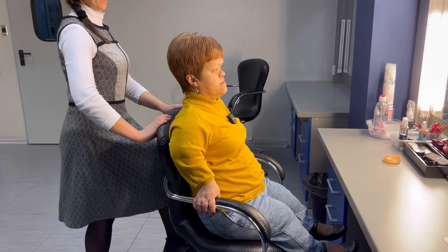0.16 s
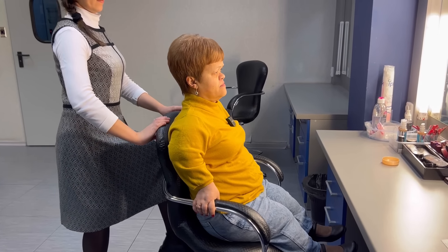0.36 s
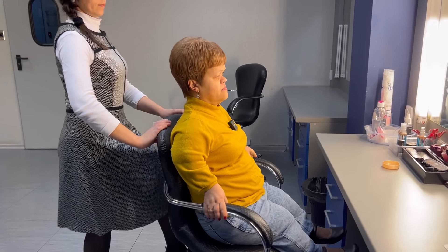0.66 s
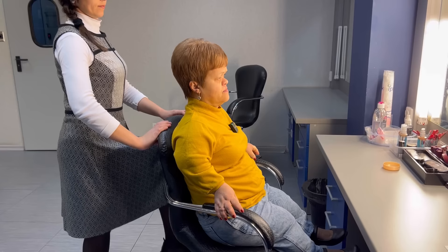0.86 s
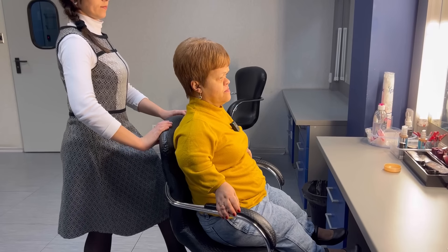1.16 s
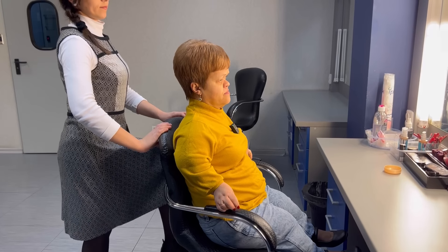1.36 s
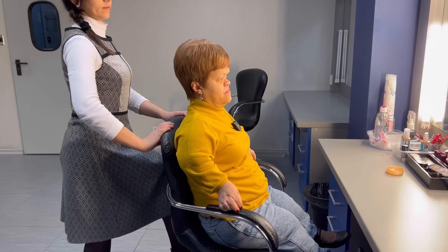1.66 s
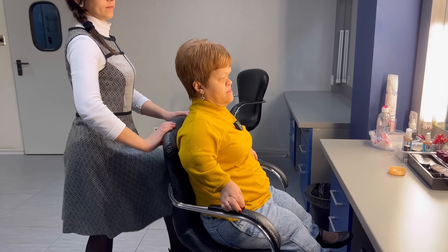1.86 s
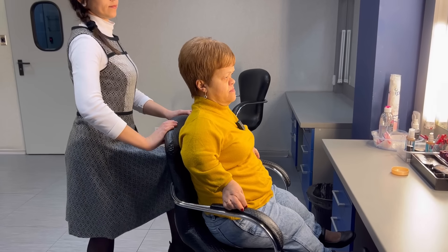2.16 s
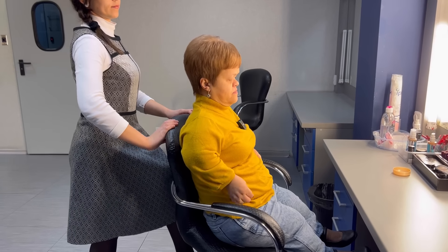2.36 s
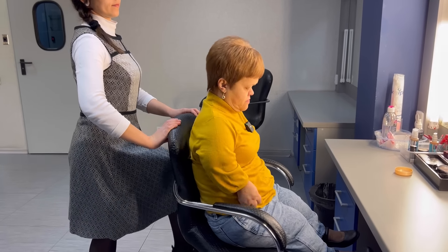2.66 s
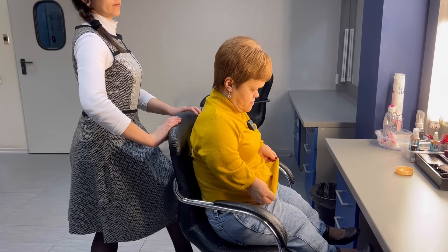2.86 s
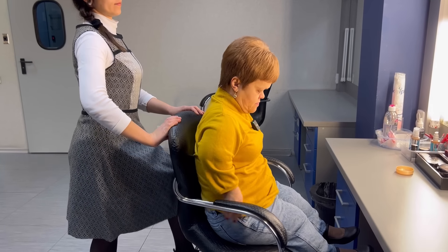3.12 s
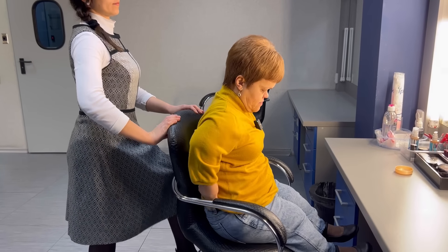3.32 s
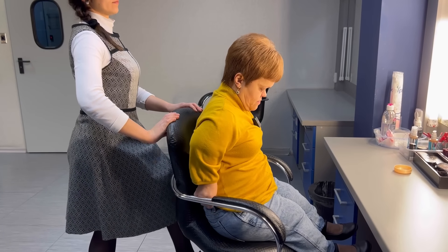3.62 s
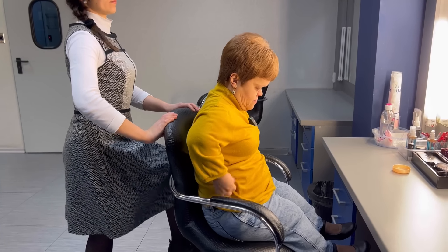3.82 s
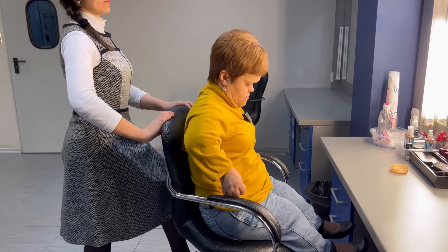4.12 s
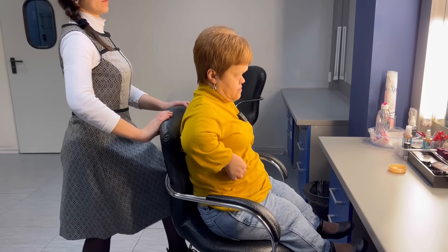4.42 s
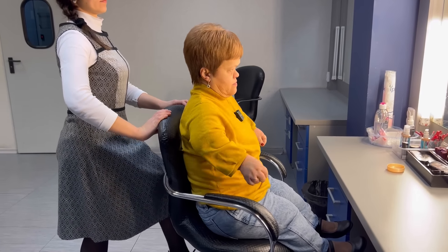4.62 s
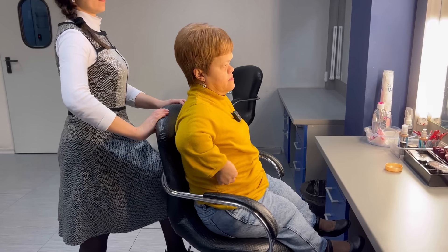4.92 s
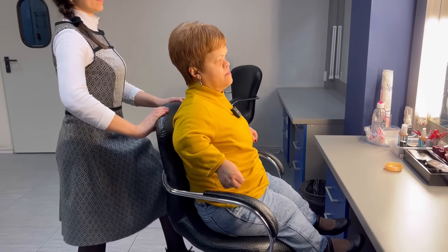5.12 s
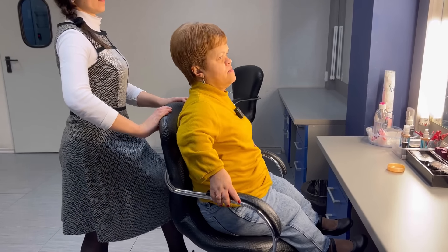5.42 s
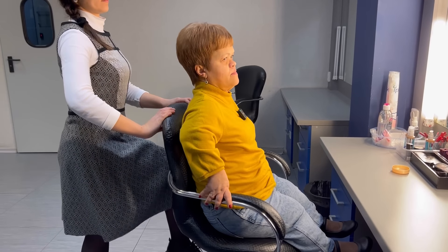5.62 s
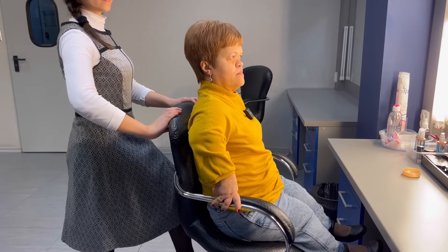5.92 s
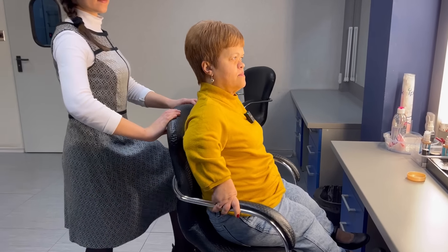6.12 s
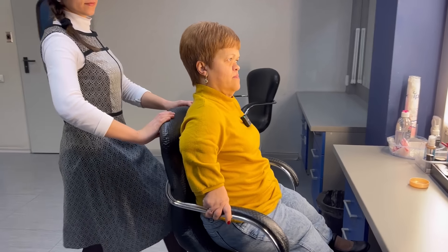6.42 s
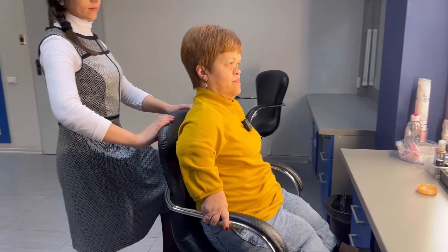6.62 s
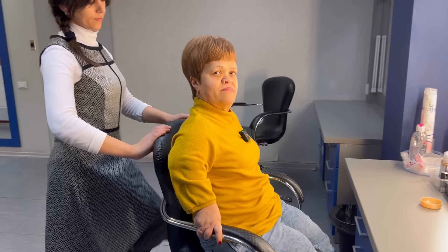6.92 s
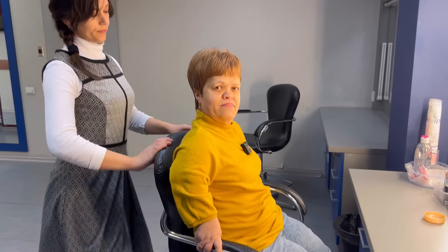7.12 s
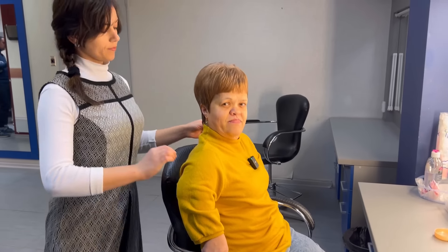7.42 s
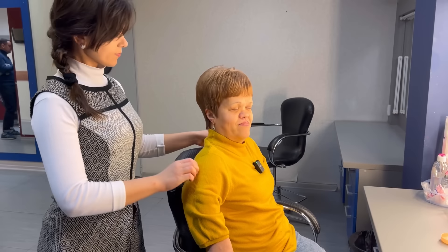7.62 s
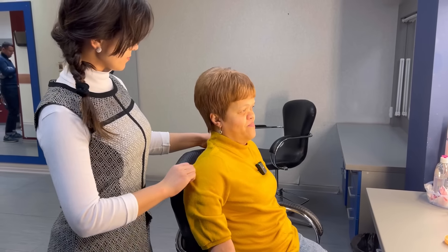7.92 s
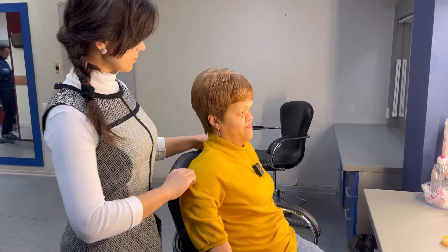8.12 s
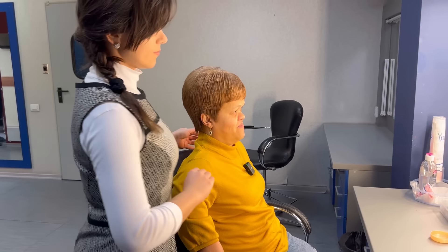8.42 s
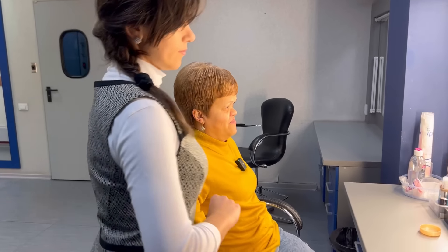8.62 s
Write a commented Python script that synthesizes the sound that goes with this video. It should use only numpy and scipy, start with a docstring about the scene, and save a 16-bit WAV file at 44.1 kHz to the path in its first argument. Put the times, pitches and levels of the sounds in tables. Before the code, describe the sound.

From the very start, a foot pumps the pedal of a hydraulic salon chair, fifteen strokes at a little over two a second. Each push is a dull clunk with a steel clank and a low boom from the chair base, and the pedal knocks softly as it springs back. The strokes are slightly brighter from about 2.7 to 4 seconds, and the last lands at about 6.3 seconds. Faint upholstery ticks and clothing rustles come in between. From about 6.6 to 6.9 seconds the pedal is kicked and rattles briefly. Three soft-soled footsteps follow at roughly 7.3, 7.9 and 8.5 seconds, the last one heaviest, with a light rustle of cloth. The chair is a couple of metres from the microphone in a bare, hard-floored room with a short echo. A quiet, low room tone and faint hiss run underneath.

```python
"""A pedal clanks down and knocks softly back, fifteen strokes in all; then it is kicked and rattles.
A foot is pumping up a hydraulic salon chair a couple of metres away, in a bare, hard-floored room.
Each push lands steel on steel and makes the base boom; a spring lifts the pedal again.
Upholstery ticks, clothes rustle and three steps follow, over a quiet room tone and faint hiss."""
import sys
import numpy as np
from scipy import signal
from scipy.fft import rfft, irfft, next_fast_len
from scipy.io import wavfile
from scipy.ndimage import uniform_filter1d

SR = 44100
rng = np.random.default_rng(int(sys.argv[2]) if len(sys.argv) > 2 else 0)


def dump(signal):
    """Clip the signal to [-1, 1] and save it as 16-bit WAV at the path in sys.argv[1]."""
    limited = np.clip(np.atleast_2d(signal).T, -1, 1)
    pcm = np.round(limited * 32767).astype(np.int16)
    wavfile.write(sys.argv[1], SR, pcm)


N = 386757
SIZE = 32768  # samples in one short sound
T = np.arange(SIZE) / SR
HZ = np.fft.rfftfreq(SIZE, 1 / SR)
TOP_HZ = 15830
PUMP_START_S, PUMP_END_S = 0.2, 6.5
# deep notes of the chair base and floor: f/Hz, level/dB, time to fade by 60 dB/s
BASE_NOTES = [(50.2, -12.5, 0.39), (71.5, -8, 0.34), (101.4, -8, 0.24), (115.6, 0, 0.3), (178.4, -4, 0.29),
              (234.4, -6.5, 0.44), (271.2, -9.5, 0.33)]


def pedal_pushes(walls):
    """The pedal lands with a dull clunk; then steel seats on steel, ringing higher on hard strokes."""
    # strokes: t/s, weight of the foot/dB, clank of the steel/dB, brightness/dB
    strokes = [(0.101, -31, -26.5, -1.5), (0.556, -35.5, -29.5, -1), (1.019, -35, -30.5, -1),
               (1.461, -27.5, -29.5, -1), (1.880, -27.5, -28, 0), (2.288, -29.5, -29.5, -1),
               (2.713, -28, -29, 2), (3.127, -28.5, -28.5, 2.5), (3.547, -29.5, -29, 3),
               (3.964, -29.5, -29.5, 4), (4.419, -30.5, -33.5, 0), (4.885, -35, -36.5, -1),
               (5.360, -28.5, -32.5, 0), (5.783, -29, -35, 2), (6.259, -26.5, -32.5, 0)]
    # tone of the lower stop: f/Hz, level/dB
    stop_tone = [(120, -44), (230, -4.5), (320, 2), (480, -1), (600, -5), (860, -6.5), (1250, -2),
                 (1500, -9.5), (1900, -14), (2250, -26.5), (3400, -34.5), (8000, -44), (15000, -36.5)]
    # where the pump and pedal ring: f/Hz, width/Hz, boost/dB
    pump_rings = [(414, 84, 8), (487, 10, 1), (776, 21, 6.5), (970, 35, 5.5), (1063, 37, 2.5),
                  (1187, 17, 1), (1275.7, 15.6, -2), (1416, 18, -4), (2634, 550, 10), (4300, 460, 8.5),
                  (4930, 370, 7.5), (5700, 210, 6), (6370, 120, 7), (6820, 540, 7.5), (7800, 110, 5),
                  (8470, 120, 6), (9820, 140, 8.5), (13400, 160, 5), (14950, 250, 1)]
    # what one dB of brightness adds: f/Hz, boost/dB
    brighter = [(1900, 0), (2650, -.7), (5000, 0), (10000, .5), (15000, 0)]
    usual_db = -30  # an ordinary stroke
    out = np.zeros(N)
    for start, weight_db, clank_db, bright_db in strokes:
        weight, clank = weight_db - usual_db, clank_db - usual_db
        hardness = 0.49 * weight + 0.89 * clank
        landing = shape(contact(0.0066, chatter_db=-13), curve([(500, -5.5), (1300, -5), (3000, -16)]))
        seating = shape(contact(0.0088, chatter_db=-2), curve([(400, -21), (1000, 3)]))
        add(landing, 0.0035 * rng.uniform(0.756, 1.2), seating)
        edge_hz = 1773 + 29 * hardness
        body = colour(stop_tone, vary(pump_rings, scatter_db=0.5) + [(edge_hz, 220, 8)])
        body += bright_db * curve(brighter)
        bands = [(300, 710, weight_db - 8),  # clunk
                 (730, 1230, clank_db - 8.5),  # clank
                 (1510, 1766, -52 + hardness),  # hard edge of the steel
                 (2830, 5050, -57.7 + 0.51 * clank)]  # bright tick
        add(out, start, ring(in_room(landing, walls, echo_db=6), body, bands))
        add(out, start, boom(BASE_NOTES, -41.5 + 1.55 * weight, swell_cycles=1.36))
    return out


def pedal_returns(walls):
    """The spring lifts the pedal against a padded stop; the loose linkage knocks faintly."""
    # the pedal springs back: t/s, level/dB
    returns = [(0.316, -47), (0.789, -42), (1.233, -38.5), (2.055, -39), (2.476, -36.5), (2.908, -37),
               (3.318, -41), (3.734, -38), (4.168, -44.5), (4.645, -38.5), (5.109, -36), (5.541, -38),
               (6.005, -42), (6.465, -45)]
    # the linkage takes up its slack: t/s, level/dB
    slack_knocks = [(0.923, -41), (1.671, -39), (1.837, -41.5), (2.253, -35.5), (2.993, -40.5),
                    (4.204, -40), (4.545, -36.5), (5.074, -43.5), (6.594, -42), (7.182, -43.5)]
    # tone of these soft knocks: f/Hz, level/dB
    knock_tone = [(120, 2), (230, -1), (330, 1.5), (480, 1.5), (800, -10.5), (1300, -11.5), (2100, -28),
                  (4500, -39.5), (8000, -54), (15000, -49)]
    usual_db = -39.5  # an ordinary return
    out, body = np.zeros(N), colour(knock_tone)
    for start, db in returns:
        touch = contact(0.0049, chatter_db=1.5)
        add(touch, 0.006, amp(5) * contact(0.0036, chatter_db=-2))  # the pad gives, then bottoms out
        add(out, start, ring(in_room(touch, walls, echo_db=2.5), body, [(286, 2000, db - 6)]))
        add(out, start, boom(BASE_NOTES, -45 + 0.35 * (db - usual_db), swell_cycles=0.13))
    for start, db in slack_knocks:
        force = in_room(contact(0.0074, chatter_db=-0.5), walls, echo_db=0)
        add(out, start, ring(force, body, [(278, 2000, db - 13.5)]))
    return out


def pedal_rattle(walls):
    """The kicked pedal bounces and scrapes in its joint, each contact with its own ring."""
    # bounces: t/s, low knock/dB, ring/dB, fade time/s, ring f/Hz
    bounces = [(6.640, -32, -56, 0.0037, 885), (6.669, -38.5, -53, 0.016, 5400),
               (6.735, -40, -48, .006, 7260), (6.750, -46, -51.5, 0.013, 7500),
               (6.782, -39.5, -63, 0.012, 1350), (6.828, -37.5, -43.5, 0.0053, 5070),
               (6.857, -42, -52.5, 0.02, 5400)]
    # tone of the kick: f/Hz, level/dB
    kick_tone = [(50, -26), (100, 3), (200, -6.5), (400, 3), (1400, -4), (2100, -10), (5000, -20),
                 (9000, -32.5), (15000, -46)]
    # where the loose pedal rings: f/Hz, width/Hz, boost/dB
    lever_rings = [(400, 72, 3.5), (600, 51, 2), (830, 120, 1.5), (1330, 200, 3.5), (2780, 620, 7),
                   (4260, 160, 1), (5450, 180, -2), (7360, 270, 6)]
    clank_db = -41.5
    out = np.zeros(N)
    for start, low_db, ring_db, fade_s, ring_hz in bounces:
        force = in_room(contact(fade_s, chatter_db=3.5), walls, echo_db=3.5, drift=2.2)
        body = colour(kick_tone, vary(lever_rings, scatter_db=3) + [(ring_hz, 500, 11)])
        bands = [(200, 760, low_db - 3), (724, 1460, clank_db), (2400, 8700, ring_db - 5.5)]
        add(out, start, ring(force, body, bands))
    return out


def footsteps():
    """Soft soles meet the floor, heel then toe, and the floor thuds under the weight."""
    # touches: t/s, sole/dB, floor thud/dB, fade time/s
    touches = [(7.339, -43, -54.5, 0.0043), (7.376, -42.5, -60, 0.019), (7.459, -53.5, -59, 0.012),
               (7.907, -46, -52, 0.038), (7.94, -40.5, -53, 0.044), (8.545, -41, -45, 0.003),
               (8.555, -38, -39, 0.0069)]
    # tone of a shoe: f/Hz, level/dB
    shoe_tone = [(50, -33), (120, -2), (300, 1.5), (550, -6), (900, -6.5), (1500, -13), (2500, -25.5),
                 (6000, -41.5), (15000, -58)]
    # where the heel rings: f/Hz, width/Hz, boost/dB
    heel_rings = [(298, 72, 2.5), (530, 44, 5.5), (770, 48, 4)]
    # deep notes of the floor: f/Hz, level/dB, time to fade by 60 dB/s
    floor_notes = [(73, -10, 0.33), (86.7, -4.5, 0.33), (98, -11, 0.5), (160, -12, 0.26)]
    out, body = np.zeros(N), colour(shoe_tone, heel_rings)
    for start, sole_db, thud_db, fade_s in touches:
        force = in_room(contact(fade_s, chatter_db=3), echoes(), echo_db=9.5)
        knock, scuff = (182, 810, sole_db - 1.5), (900, 3300, sole_db - 13.5)
        add(out, start, ring(force, body, [knock, scuff]))
        add(out, start, boom(floor_notes, thud_db, swell_cycles=0.45))
    return out


def upholstery_ticks():
    """The seat cover and clothes give small snaps; the shortest ones ping."""
    # snaps: t/s, level/dB, f/Hz, fade time/s, spread to each side/octaves
    snaps = [(1.556, -57, 4200, 0.005, 1.1), (1.629, -57, 4600, .014, 1.1), (2.511, -69, 5500, .003, .9),
             (2.851, -58, 5500, 0.0068, 1.1), (3.788, -55, 5600, 0.002, .3), (4.574, -58, 9000, .012, 1.3),
             (4.68, -69, 10500, .005, 1.1), (5.259, -74, 7500, .003, .5), (6.503, -66, 5400, 0.0017, .8)]
    out = np.zeros(N)
    for start, db, hz, fade_s, spread in snaps:
        ping_db = 18 * np.exp(-fade_s / 0.004)
        octaves = np.log2((HZ + 1) / hz)
        hump_db = 11 * np.minimum(octaves + spread, 0) - 20 * np.maximum(octaves - spread, 0)
        body = hump_db + ping_db / (1 + ((HZ - hz) / 400) ** 2)
        slips = signal.fftconvolve(contact(fade_s, chatter_db=22), np.r_[1, amp(1.5) * echoes()])
        snap = shape(flatten(slips[:SIZE], smooth_hz=500), body)
        add(out, start, amp(db) * snap / strength(snap))
    return out


def cloth_rubs():
    """Cloth and soles rub, and some rubs trail a faint, very high swish of cloth."""
    # rubs, and high cloth swishes (the rows from 11000 Hz up): middle t/s, level/dB, half length/s, f/Hz
    rubs = [(0.33, -66, 0.08, 3300), (1.66, -60, 0.055, 2200), (2.63, -68, 0.073, 5000),
            (2.68, -68.5, 0.11, 14000), (2.935, -65.5, 0.057, 3300), (3.35, -70, 0.057, 11000),
            (4.581, -61.5, 0.016, 3700), (4.62, -68.5, .1, 13500), (4.95, -64.5, 0.07, 2490),
            (5.127, -68, 0.039, 2650), (5.284, -66, 0.035, 2440), (7.152, -63.5, .08, 960),
            (7.18, -69, 0.09, 3200), (7.22, -73, .13, 14500), (7.94, -66, 0.084, 3500),
            (8.0, -71, .1, 14000), (8.42, -68, 0.026, 3400), (8.714, -64, 0.055, 3600)]
    # ten fainter rubs at chance moments during the pumping
    fidgets = [(np.interp(when, [0, 1], [PUMP_START_S, PUMP_END_S]), -76.5, 0.07,
                2900 * 2 ** (1.2 * (pitch - 0.5))) for when, pitch in rng.random((10, 2))]
    out, middle = np.zeros(N), T[-1] / 2
    for peak_s, db, half_s, hz in rubs + fidgets:
        grains = rng.standard_normal(SIZE) * (rng.random(SIZE) < 0.02)
        swell = grains * np.exp(-((T - middle) / half_s) ** 2)
        blurred = signal.fftconvolve(swell, np.r_[1, 0.7 * echoes()])[:SIZE]
        body = colour([(hz / 6, -19), (hz / 2, -8), (hz, 0), (hz * 2, -14)], [(hz, hz / 4, 4)])
        sound = shape(blurred, body)
        add(out, max(peak_s - middle, 0), amp(db - 2) * sound / strength(sound[SIZE // 2:]))
    return out


def background():
    """Low room tone, a little fuller while the pump works, and steady microphone hiss."""
    # room tone: f/Hz, level/dB
    room_tone = [(25, -5), (50, -10), (105, 0.5), (260, 0.5), (480, -3.5), (700, -6.5), (1050, -9.5),
                 (1600, -17.5), (2400, -26), (4000, -42.5)]
    # hiss: f/Hz, level/dB
    hiss_tone = [(500, -1), (2000, 0.5), (4000, -1.5), (8000, -4), (15000, -6)]
    pumping = np.interp(np.arange(N) / SR, [PUMP_END_S, PUMP_END_S + 1], [1, 0])
    room = amp(-58.2 + 1.5 * pumping) * noise(room_tone + [(12000, -49)])
    return room + amp(-71.5) * noise(hiss_tone)


def contact(fade_s, chatter_db):
    """One blow followed by a burst of tiny slips."""
    slips = rng.standard_normal(SIZE) * (rng.random(SIZE) < 0.08) * np.exp(-T / fade_s)
    force = amp(chatter_db) * slips / np.linalg.norm(slips)
    force[0] += 1
    return force


def ring(force, body, bands):
    """A blow rings a body; each band (low f/Hz, high f/Hz, level/dB) starts near its level."""
    plain = shape(force, body)[:SR // 20]
    boosts = []
    for low, high, db in bands:
        band_pass = signal.butter(3, [low, min(high, TOP_HZ)], "band", fs=SR, output="sos")
        boost = db - 20 * np.log10(strength(signal.sosfilt(band_pass, plain)))
        inset = (high / low) ** 0.25
        boosts += [(low * inset, boost), (high / inset, boost)]
    return shape(force, body + curve(boosts))


def boom(notes, db, swell_cycles, scatter_db=0):
    """Heavy parts take a moment to swell, then ring down."""
    out = np.zeros(SIZE)
    for hz, level, fade_s in notes:
        swell = 1 - np.exp(-(T * hz / swell_cycles) ** 2)
        turns = hz * (1 + rng.normal(0, 0.018)) * T + rng.random()
        fade = amp(level + rng.normal(0, scatter_db) - 60 * T / fade_s)
        out += fade * swell * np.sin(2 * np.pi * turns)
    return amp(db - 4) * out / out[:SR // 10].std()


def vary(rings, scatter_db):
    """Every blow wakes the ringing notes at slightly new strengths."""
    return [(hz, width, db + rng.normal(0, scatter_db)) for hz, width, db in rings]


def echoes(early_db=5, early_s=0.011, gap_s=0.0034):
    """The room answers with a wash of echoes: near walls first, then a long tail."""
    # how long the room rings: f/Hz, time to fade by 60 dB/s
    fade_times = [(100, 0.47), (500, 0.46), (1500, 0.54), (4000, 0.52), (10000, 0.35), (16000, 0.18)]
    hz, t, spectrum = signal.stft(rng.standard_normal(SIZE), SR, nperseg=256)
    fade = amp(-60 * t / curve(fade_times, hz)[:, None])
    tail = signal.istft(spectrum * fade, SR, nperseg=256)[1][:SIZE]
    tail *= 1 + amp(early_db) * np.exp(-T / early_s)
    tail *= 1 - np.exp(-(T / gap_s) ** 2)
    return tail / np.linalg.norm(tail)


def in_room(force, walls, echo_db, drift=0.72):
    """The direct sound plus the walls' echoes, which shift a little as people move."""
    # the chair blocks treble coming straight from the floor: f/Hz, level/dB
    shadow = [(1200, 0), (3000, -10), (8000, -10)]
    path = amp(echo_db) * (walls + drift * echoes()) / np.hypot(1, drift)
    path += shape([1.], colour(shadow))
    return flatten(signal.fftconvolve(force, path)[:SIZE])


def flatten(sound, smooth_hz=110):
    """Even out bass and treble, keeping only the narrow peaks and dips."""
    power = np.abs(rfft(sound)) ** 2
    for _ in range(2):
        power = uniform_filter1d(power, int(smooth_hz / HZ[1]))
    return shape(sound, -10 * np.log10(np.abs(power) + 1e-9))


def shape(sound, db):
    """Filter by a dB curve so that nothing rings before the blow (minimum phase)."""
    cepstrum = irfft(np.log(amp(db) + 1e-6))
    cepstrum[1:SIZE // 2] *= 2
    cepstrum[SIZE // 2 + 1:] = 0
    return irfft(rfft(sound, SIZE) * np.exp(rfft(cepstrum)))


def colour(tone, rings=()):
    """A smooth dB curve with a bump wherever the object rings."""
    return curve(tone) + sum(db / (1 + (2 * (HZ - hz) / width) ** 2) for hz, width, db in rings)


def noise(tone):
    """Steady noise with this tone, at a strength of 1."""
    size = next_fast_len(N)
    gain = amp(curve(tone, np.fft.rfftfreq(size, 1 / SR)))
    sound = irfft(rfft(rng.standard_normal(size)) * gain, size)[:N]
    return sound / sound.std()


def curve(points, hz=HZ):
    """Join (f/Hz, value) points with straight lines on a pitch scale."""
    freqs, values = np.transpose(points)
    return np.interp(np.log(hz + 1), np.log(freqs), values)


def amp(db):
    """Turn decibels into a multiplier."""
    return 10 ** (np.asarray(db) / 20)


def strength(sound):
    """Average size (rms) of the first 30 ms."""
    return np.sqrt(np.mean(sound[:SR * 3 // 100] ** 2) + 1e-20)


def add(track, start_s, sound):
    """Mix a sound in at a time."""
    part = track[round(start_s * SR):][:len(sound)]
    part += sound[:len(part)]


def scene():
    """Mix everything; the pedal sounds come from one place, so they share their echoes."""
    walls = echoes()
    pedal = pedal_pushes(walls) + pedal_returns(walls) + pedal_rattle(walls)
    return (pedal + footsteps() + upholstery_ticks() + cloth_rubs() + background())[None]


def record(dry):
    """Deep rumble below about 42 Hz falls away, and all treble above TOP_HZ is cut."""
    size = next_fast_len(N + SR // 2)
    hz = np.fft.rfftfreq(size, 1 / SR)
    thinned = signal.sosfilt(signal.butter(3, 42, "high", fs=SR, output="sos"), dry)
    return irfft(rfft(thinned, size) * (hz < TOP_HZ), size)[:, :N]


dry = scene()
out = record(dry)
dump(out)
```